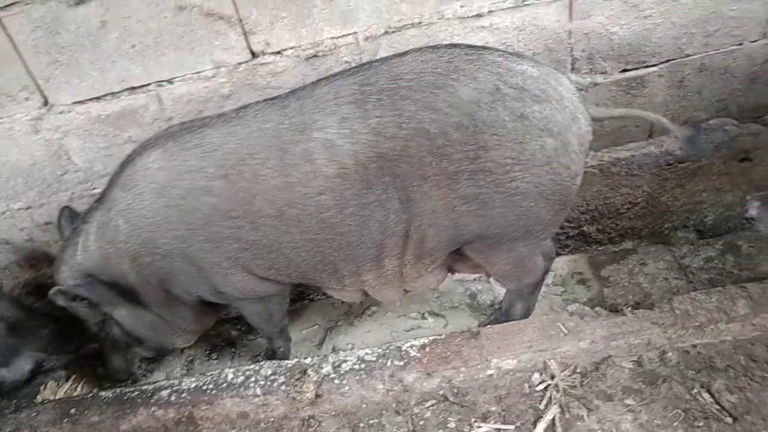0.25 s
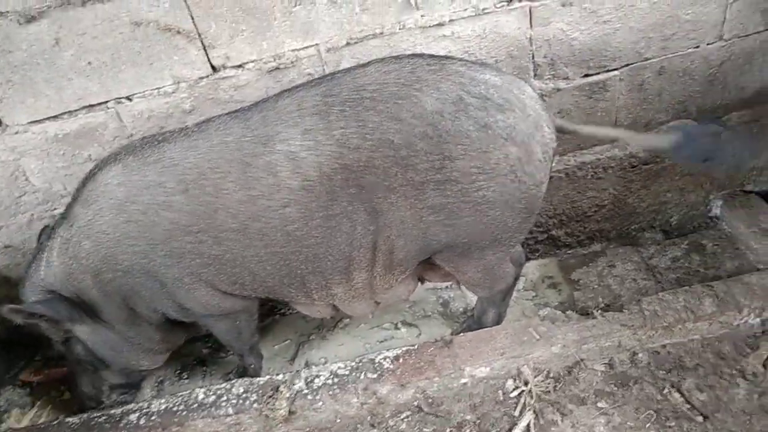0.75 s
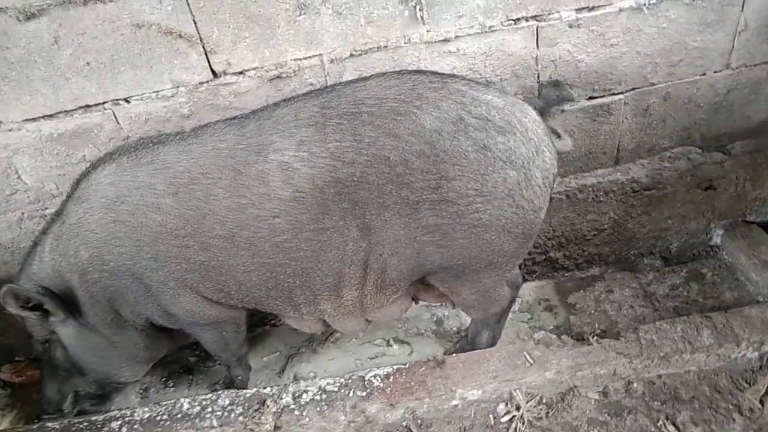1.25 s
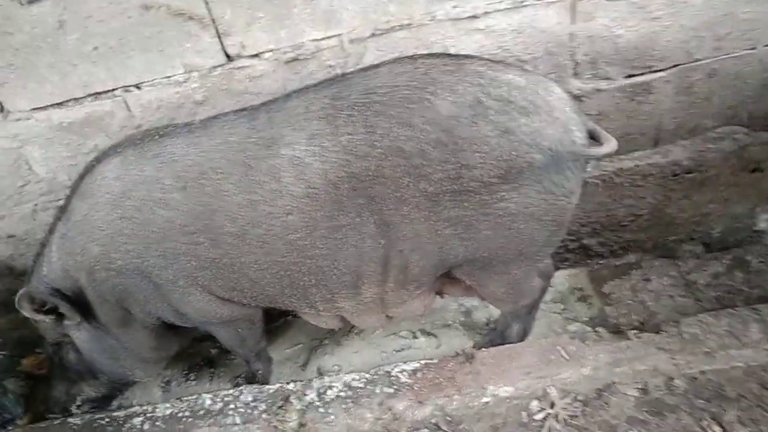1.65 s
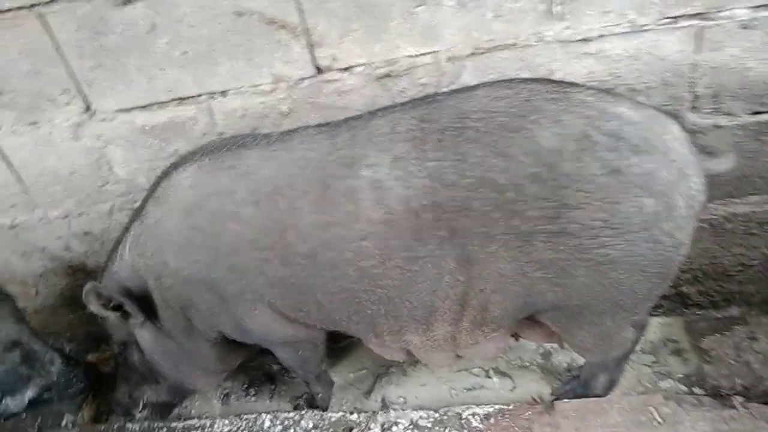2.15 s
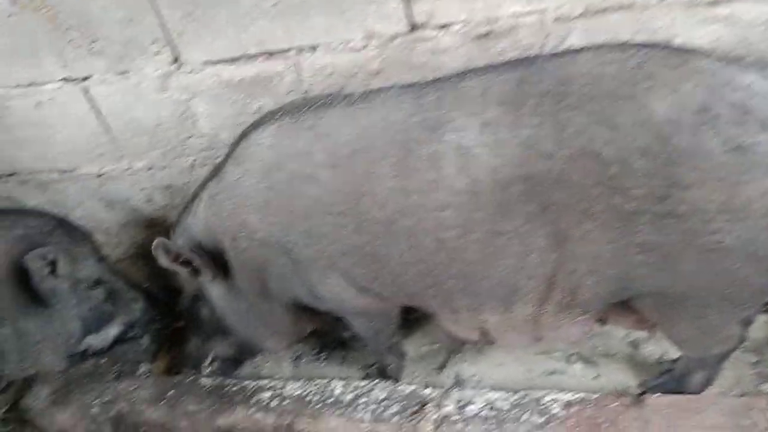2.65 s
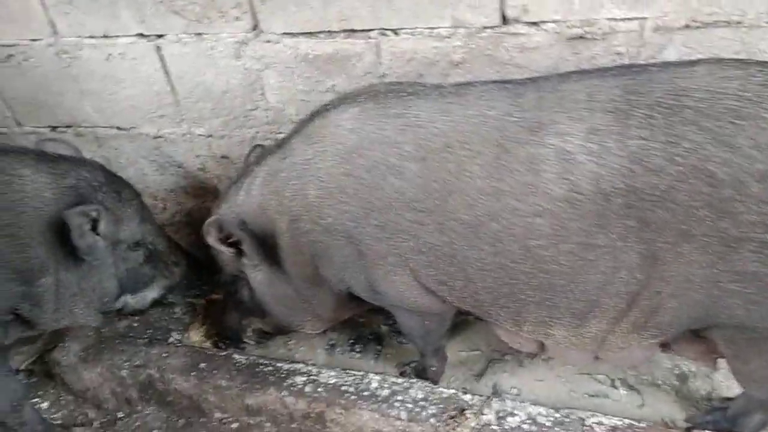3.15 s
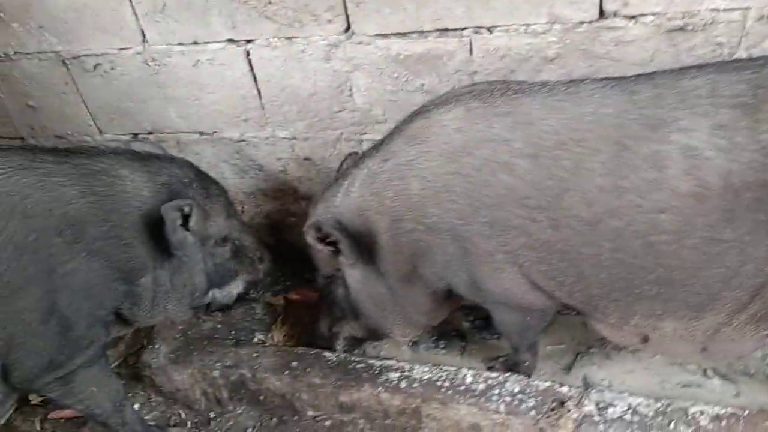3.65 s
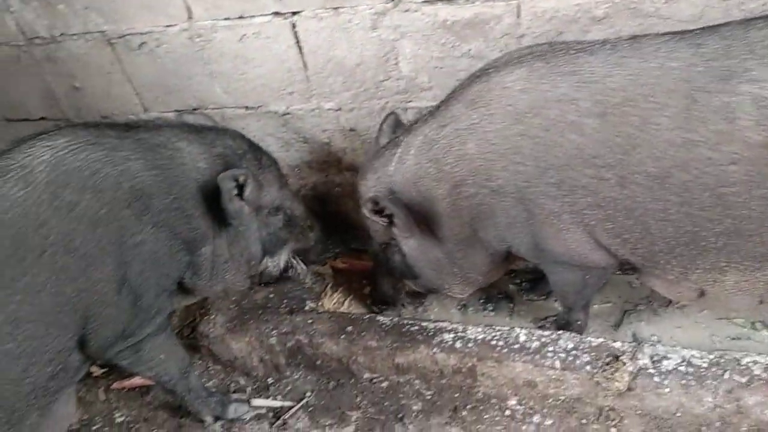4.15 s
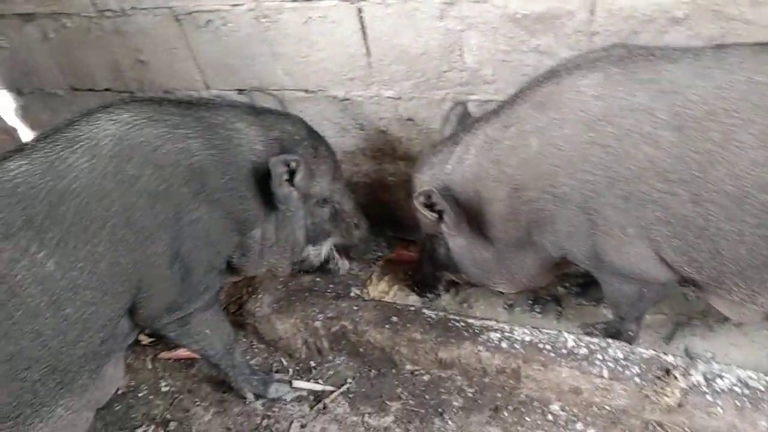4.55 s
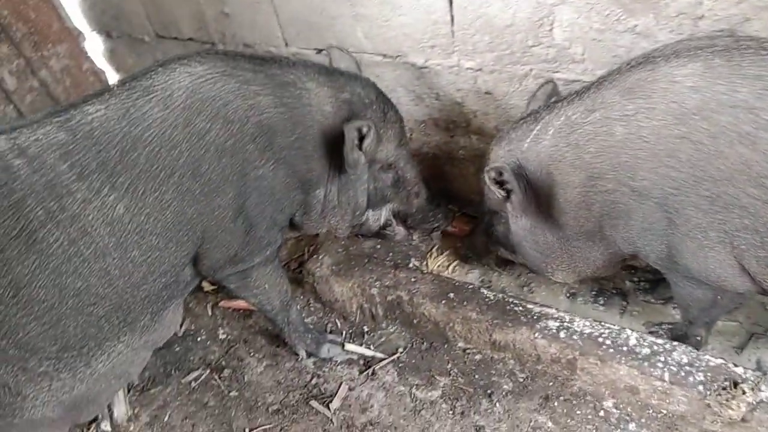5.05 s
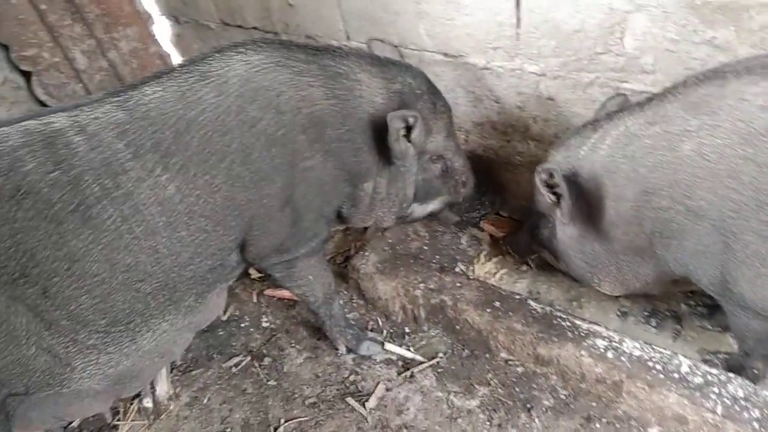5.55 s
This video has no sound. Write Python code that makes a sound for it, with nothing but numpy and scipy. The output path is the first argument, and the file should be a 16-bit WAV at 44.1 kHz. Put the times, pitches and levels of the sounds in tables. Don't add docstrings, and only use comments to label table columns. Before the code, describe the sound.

Close, wet, irregular pig eating: sucking slurps, sharp lip smacks, squelches and plops in a small hard-walled pen.

```python
import sys
import numpy as np
from scipy import signal
from scipy.fft import rfft, irfft, next_fast_len
from scipy.io import wavfile
from scipy.ndimage import uniform_filter1d, map_coordinates

SR = 44100
rng = np.random.default_rng(int(sys.argv[2]) if len(sys.argv) > 2 else 0)


def persist_wave(psi):
    counts = np.round(np.clip(psi, -1, 1) * 32767).astype(np.int16)
    wavfile.write(sys.argv[1], SR, np.atleast_2d(counts).T)


def elevation(decibels):
    levels = np.asarray(decibels, float)
    return 10 ** (levels / 20)


N = 256030

# (frequency [Hz], density [dB per Hz])
MOUTH_SPECTRUM = [(800, -120), (1150, -29), (1350, -6.5), (1600, -3.5), (2400, -4), (3200, 0), (3800, -7.5),
                  (4600, -29), (7000, -120)]
# (frequency [Hz], density [dB per Hz])
SPRAY_SPECTRUM = [(2400, -120), (3500, -13.5), (4500, -6.5), (6600, -4.5), (8500, -9.5), (10500, -15.5),
                  (11500, -25.5), (16000, -31.5)]


def unit(x):
    return x / np.sqrt(np.mean(x ** 2) + 1e-20)


def curve(rows):
    return np.interp(np.arange(N) / SR, *np.transpose(rows))


def along(points, hz):
    f, v = np.transpose(points)
    return np.interp(np.log(hz + 1), np.log(f + 1), v)


def filtered(x, response):
    m = next_fast_len(len(x) + 4096)
    return irfft(rfft(x, m) * response(np.fft.rfftfreq(m, 1 / SR)), m)[:len(x)]


def coloured(x, spectrum):
    return unit(filtered(x, lambda hz: elevation(along(spectrum, hz))))


def resonance(hz, width_hz):
    def response(f):
        single = 1j * f * width_hz / (hz * hz - f * f + 1j * f * width_hz)
        return single ** 2 * np.minimum(f / hz, 1) ** 2
    return response


def formant(x, hz, width_hz, lift_db):
    f, t, z = signal.stft(x, SR, nperseg=256)
    at = np.minimum((t * SR).astype(int), N - 1)
    lift = elevation(lift_db[at] / (1 + ((f[:, None] - hz[at]) / width_hz) ** 2))
    lift = lift / np.sqrt(np.mean(lift[8:22] ** 2, axis=0))
    return signal.istft(z * lift, SR, nperseg=256)[1][:N]


def patchy(x, depth_db, bins, frames, size=256):
    z = signal.stft(x, nperseg=size)[2]
    field = uniform_filter1d(rng.standard_normal(z.shape), bins, 0)
    field = uniform_filter1d(field, frames, 1)
    return signal.istft(z * elevation(depth_db * unit(field)), nperseg=size)[1][:len(x)]


def crackle(n, per_s, spread_db, hiss):
    hardness = elevation(spread_db * rng.standard_normal(n).clip(-2, 2))
    bursts = (rng.random(n) < per_s / SR) * hardness
    signs = np.sign(rng.standard_normal(n))
    return unit(unit(bursts * signs) + hiss * rng.standard_normal(n))


def bubbles(count, centre_hz, octaves, cycles):
    draw, t = rng.random((count, 2)), np.arange(1024) / SR
    hz = centre_hz * 2 ** (octaves * rng.standard_normal((count, 1)).clip(-2, 2))
    life = t * hz / cycles
    size = elevation(2.6 * np.minimum(-np.log(draw[:, 1:] + 1e-9), 3))
    swing = np.sin(2 * np.pi * hz * t * (1 + 0.12 * life))
    tones = size * life * np.exp(-4 * life) * swing
    at = (draw[:, :1] * N).astype(int) + np.arange(1024)
    return unit(np.bincount(at.ravel(), tones.ravel())[:N])


def rings(events, rise, attack_s):
    out, t = np.zeros(N + SR), np.arange(SR // 5) / SR
    for s, db, hz, t60 in events:
        phase = 2 * np.pi * hz * (t + rise * t * t)
        decay = elevation(db - 60 * t / np.clip(t60, 0.01, 0.3))
        out[round(s * SR):][:len(t)] += decay * (1 - np.exp(-t / attack_s)) * np.sin(phase)
    return out[:N]


def squeezes(events, sharpness, attack_share):
    out, t = np.zeros(N + SR), np.arange(SR // 5) / SR
    for s, db, hz, t60 in events:
        t60 = np.clip(t60, 0.01, 0.3)
        films = crackle(len(t), per_s=2200, spread_db=5.5, hiss=0.66)
        burst = unit(filtered(films, resonance(hz, hz / sharpness)))
        swell = 1 - np.exp(-t / (attack_share * t60))
        out[round(s * SR):][:len(t)] += elevation(db + 5 - 60 * t / t60) * swell * burst
    return out[:N]


def effort(starts, holds, levels_db, rise_s, sag_db_per_s, fall_db_per_s, rest_db):
    step = 32
    t = np.arange(0, N + step, step) / SR - np.reshape(starts, (-1, 1))
    sag_db = sag_db_per_s * t.clip(0)
    fall_db = fall_db_per_s * (t - np.reshape(holds, (-1, 1))).clip(0)
    gain = elevation(np.reshape(levels_db, (-1, 1)) - sag_db - fall_db) * np.clip(t / rise_s, 0, 1) ** 2
    power = np.sum(gain ** 2, axis=0) + elevation(rest_db) ** 2
    return np.interp(np.arange(N) / step, np.arange(len(power)), np.sqrt(power))


def air():
    # (frequency [Hz], density [dB per Hz])
    hum_spectrum = [(15, -70), (30, -30), (42, -2), (54, -6), (75, -13), (150, -27), (400, -34.5)]
    # (frequency [Hz], density [dB per Hz])
    pen_spectrum = [(1000, -47), (1500, -14), (3000, -1.5), (4100, -5.5), (5000, 0.5), (6400, -6),
                    (7100, -21), (16000, -28)]
    # (frequency [Hz], density [dB per Hz])
    hiss_spectrum = [(8000, -120), (10800, 0), (16000, -4)]
    hum = elevation(-72) * coloured(rng.standard_normal(N), hum_spectrum)
    breath = patchy(rng.standard_normal(N), depth_db=7, bins=3, frames=5, size=1024)
    trough = elevation(-69.5) * unit(filtered(breath, resonance(480, width_hz=190)))
    munching = patchy(rng.standard_normal(N), depth_db=8.5, bins=3, frames=18)
    far = elevation(-55.5) * coloured(munching, pen_spectrum)
    hiss = elevation(-79) * coloured(rng.standard_normal(N), hiss_spectrum)
    return hum + trough + far + hiss


def walls(x):
    # (frequency [Hz], t60 [s])
    wall_decay = [(300, 0.24), (2500, 0.26), (10000, 0.06)]
    hz, t, z = signal.stft(rng.standard_normal(SR // 3), SR, nperseg=256)
    fade = elevation(-60 * t / along(wall_decay, hz)[:, None])
    tail = signal.istft(z * fade, SR, nperseg=256)[1]
    delayed = np.pad(x, (150, 0))
    return signal.fftconvolve(delayed, tail / np.linalg.norm(tail))[:N]


def late_notch(x):
    # (time [s], level [dB])
    notch_depth = [(4.9, -2), (5.56, -4), (5.66, -18)]
    return formant(x, np.full(N, 4350), 490, lift_db=curve(notch_depth))


def creaks():
    # (start [s], end [s], slip rate [1/s], level [dB])
    slides = [
        (2.636, 2.805, 124, -31),
        (2.826, 2.85, 85, -32),
        (2.928, 2.965, 105, -31),
    ]
    out = np.zeros(N)
    for start, end, per_s, db in slides:
        draw = rng.standard_normal((40, 2))
        s = start + (np.arange(40) + 0.12 * draw[:, 0]) / per_s
        out[(s[s < end] * SR).astype(int)] = elevation(db + 2.2 * draw[s < end, 1])
    return filtered(out, lambda f: 1 / (1 + (7000 / (f + 1)) ** 4))


def ticks():
    # (time [s], edge [dB], knock [dB], knock frequency [Hz], thump [dB])
    slips = [(4.2033, -36.7, -30.4, 2800, -51.4), (4.2288, -35.5, -28.9, 2020, -46.7),
             (4.335, -31.8, -24.2, 2070, -39.5), (4.3645, -34.4, -23.4, 2020, -40.4),
             (4.3915, -31.2, -21.1, 2150, -35.6), (4.4241, -31.1, -19.2, 1940, -37.1),
             (4.5318, -27.5, -21.2, 2370, -37.9), (4.8251, -31.7, -19.1, 1810, -37.6),
             (4.8373, -33.6, -21.4, 1350, -36.8), (4.8495, -35.3, -21.7, 1500, -36.3),
             (4.8605, -35.1, -20.6, 1550, -38.8), (4.8726, -30.7, -20.9, 2000, -35.0),
             (4.891, -33.9, -24.1, 1230, -37.3), (4.9312, -30.9, -20.2, 2000, -34.2),
             (4.9731, -27.8, -21.3, 1720, -37.1), (5.1411, -31.1, -20.1, 1590, -33.7),
             (5.2829, -48, -21, 1500, -50), (5.2849, -35, -11.5, 2050, -19.1),
             (5.3289, -25.5, -16.5, 1300, -32), (5.5003, -30.0, -14.2, 1740, -26.0)]
    out = np.zeros(N + SR)
    t = np.arange(SR // 20) / SR - 0.001
    for s, edge_db, knock_db, hz, thump_db in slips:
        edge = -elevation(edge_db + 10) * np.exp(-(t / 0.00003) ** 2) * np.cos(2 * np.pi * 7000 * t)
        snap_hz = rng.normal(4600, 500)
        snap = np.exp(-((t - 0.0001) / 0.00014) ** 2) * np.sin(2 * np.pi * snap_hz * t)
        snap = elevation((edge_db + knock_db) / 2 + 4) * snap
        u = t - 0.00042
        before, after = np.exp(-(u * hz / 0.43) ** 2), np.exp(-(u.clip(0) * hz / 0.62) ** 1.3)
        knock = -elevation(knock_db + 1.5) * np.where(u < 0, before, after) * np.sin(2 * np.pi * hz * u)
        swell = np.clip(t / 0.002, 0, 1) ** 2 * elevation(-60 * np.abs(t - 0.003) / 0.022)
        thump = elevation(1.2 * thump_db + 4) * swell * np.cos(2 * np.pi * 410 * (t - 0.0023))
        push = elevation(thump_db - 12 - 60 * np.abs(t) / 0.05) * np.sin(2 * np.pi * 140 * t.clip(0))
        out[round((s - 0.001) * SR):][:len(t)] += edge + snap + knock + thump + push
    return out[:N]


def trough_bumps():
    # (time [s], level before the attack [dB], frequency [Hz], t60 [s])
    bumps = [
        (2.121, -28.5, 182, 0.024),
        (2.324, -38, 204, 0.033),
        (3.048, -47, 72.7, 0.066),
        (3.149, -41, 183, 0.018),
        (4.829, -44.5, 166, 0.42),
        (4.898, -38, 205, 0.046),
        (5.387, -20, 690, 0.01),
    ]
    return rings(bumps, rise=0, attack_s=0.0021)


def plops():
    # (time [s], level before the slow attack [dB], frequency [Hz], t60 [s])
    pockets = [(0.026, -10.5, 1590, 0.038), (0.49, -3.5, 1584, 0.047), (0.679, -10, 1629, 0.048),
               (1.11, -9, 790, 0.02), (1.42, -17.5, 690, 0.044), (2.108, -12, 1370, 0.023),
               (2.2, -8, 243, 0.027), (2.375, -20.5, 1090, 0.037), (3.35, -21, 1360, 0.083),
               (3.711, -20, 456, 0.028), (3.977, -7.5, 991, 0.054), (4.039, -8.5, 248, 0.029),
               (5.068, -20, 1950, 0.04), (5.14, -14.5, 1477, 0.07), (5.346, -3, 2080, 0.026),
               (5.478, -13.5, 545, 0.028), (5.763, -28, 1950, 0.067)]
    return rings(pockets, rise=1.42, attack_s=0.023)


def sloshes():
    # (time [s], level [dB], frequency [Hz], t60 [s])
    shifts = [(.238, -47, 720, 0.12), (1.243, -39.5, 730, 0.067), (1.403, -32, 865, 0.056),
              (1.455, -57, 497, 0.49), (1.66, -59.5, 200, 0.14), (2.18, -35, 870, 0.055),
              (2.578, -37, 1310, 0.053), (2.79, -48, 280, .08), (3.05, -38, 1300, 0.053),
              (3.055, -48.5, 547, 0.075), (3.122, -39.5, 900, 0.069), (3.35, -41.5, 504, 0.14),
              (3.443, -44, 1300, .07), (3.87, -53, 1350, 0.25), (3.958, -44, 1310, 0.06),
              (4.665, -43.5, 687, 0.083), (4.865, -40, 253, 0.17), (4.98, -49, 398, 0.055),
              (5.105, -54, 396, 0.16), (5.142, -37.5, 660, 0.087), (5.243, -40, 302, 0.082),
              (5.352, -51, 500, .03), (5.39, -41, 131, 0.05), (5.503, -49, 900, .04)]
    return squeezes(shifts, sharpness=2.8, attack_share=0.057)


def spurts():
    # (time [s], level [dB], frequency [Hz], t60 [s])
    squirts = [(.028, -55, 10200, 0.045), (.155, -60, 12500, 0.18), (.243, -41, 6500, .03),
               (.4378, -46, 7500, 0.017), (.443, -28, 9400, 0.043), (.505, -56, 13000, .08),
               (.715, -43.5, 7400, 0.26), (.838, -51, 10000, 0.084), (.964, -38.5, 6770, .09),
               (1.34, -45, 5700, 0.091), (1.41, -50, 10700, 0.12), (1.678, -60, 8000, 0.041),
               (1.915, -41, 6000, 0.055), (2.15, -41, 6850, 0.091), (2.328, -55.5, 6640, 0.18),
               (2.377, -42, 4250, 0.086), (2.497, -42, 8140, 0.059), (2.672, -38, 7100, 0.19),
               (2.737, -37, 6800, 0.054), (2.838, -55, 8000, .04), (2.862, -43, 9800, 0.059),
               (2.868, -41, 4570, 0.12), (3.13, -59, 12400, 0.18), (3.228, -43, 3870, 0.042),
               (3.398, -45, 4600, 0.061), (3.505, -50, 12000, .15), (3.68, -51, 6050, 0.069),
               (3.69, -35, 8200, .08), (3.958, -41, 6900, 0.036), (3.98, -34, 5250, .08),
               (3.98, -50, 11000, .1), (4.258, -33, 5350, 0.086), (4.545, -45, 8650, 0.094),
               (4.595, -36.5, 5000, 0.088), (4.745, -50, 8700, 0.074), (4.96, -41, 8000, 0.1),
               (5.128, -51, 8350, 0.085), (5.251, -40.5, 6100, 0.11), (5.41, -47, 6000, 0.07),
               (5.718, -59, 12500, .14)]
    return squeezes(squirts, sharpness=3.7, attack_share=0.038)


def squelches():
    # (time [s], level [dB], frequency [Hz], t60 [s])
    presses = [(.03, -32.5, 3300, 0.048), (.155, -38, 1850, 0.13), (.243, -26.5, 3070, 0.021),
               (.392, -31.5, 3740, 0.11), (.4915, -18, 2690, 0.013), (.718, -43, 3100, 0.17),
               (.8, -38, 1620, 0.15), (.964, -34, 2940, .07), (1.105, -43, 532, 0.14),
               (1.155, -46, 1770, 0.08), (1.25, -39.5, 1670, 0.11), (1.34, -38, 2050, 0.13),
               (1.525, -44, 2200, .08), (1.8, -64, 3300, .08), (1.917, -30.5, 3500, 0.095),
               (1.945, -38, 950, 0.081), (2.03, -35, 1740, 0.055), (2.121, -37, 497, 0.016),
               (2.203, -34, 800, 0.056), (2.275, -38.5, 1820, 0.099), (2.595, -29, 2880, 0.13),
               (2.605, -30, 1270, 0.093), (2.736, -42, 1310, 0.059), (2.79, -32.5, 1690, 0.14),
               (2.853, -29.5, 1320, 0.048), (2.858, -34, 2900, .07), (2.872, -34.5, 1660, 0.039),
               (3.331, -35, 2070, 0.16), (3.355, -62, 306, .1), (3.388, -32.5, 1340, 0.12),
               (3.503, -33.5, 4300, 0.11), (3.504, -37, 3560, 0.043), (3.791, -39, 3550, 0.043),
               (3.974, -32.5, 3250, 0.075), (4.008, -36.5, 1750, 0.12), (4.268, -31, 2430, 0.016),
               (4.478, -46.5, 1750, 0.066), (4.566, -38, 960, 0.091), (4.594, -33.5, 3030, 0.084),
               (4.872, -38, 2420, 0.14), (5.128, -40.5, 377, 0.1), (5.147, -29, 1380, 0.038),
               (5.235, -33.5, 1830, 0.066), (5.264, -28.5, 380, 0.028), (5.336, -30.5, 2030, 0.059),
               (5.362, -41, 1930, 0.06), (5.411, -39, 1490, 0.053), (5.47, -40, 750, 0.12),
               (5.627, -37, 1820, .06), (5.725, -39, 2330, 0.065)]
    return squeezes(presses, sharpness=3.3, attack_share=0.047)


def smacks():
    # (time [s], peak level [dB], mouth [Hz], spray relative
    # level [dB], t60 [s])
    partings = [(0.0235, -22.5, 1670, -5, 0.027), (0.3849, -21.5, 2640, 0.5, 0.22),
                (0.4415, -12.5, 1260, 9, 0.021), (0.834, -19, 3120, -1.5, 0.09),
                (1.1748, -19, 3240, -2.5, 0.081), (1.4121, -33.5, 920, 7.5, 0.072),
                (1.488, -26.5, 3600, 3.5, 0.17), (2.5706, -22.5, 2670, -0.5, 0.097),
                (2.6138, -12, 3140, -16, 0.067), (2.733, -22.5, 2200, 2, 0.06),
                (2.86, -18.5, 920, 1.5, 0.12), (2.9565, -23, 2800, 6, 0.028),
                (3.0769, -16.5, 3450, -6.5, 0.086), (3.687, -26, 805, 16, 0.15),
                (3.977, -20.5, 1070, 7.5, 0.1), (4.2572, -30, 3020, 10, 0.15), (4.3537, -32, 3380, 6, 0.24),
                (4.574, -28.5, 1280, 0, 0.18), (4.954, -25.5, 2120, -2, 0.13),
                (5.117, -22, 2730, -7.5, 0.054), (5.2486, -28, 2010, -9, 0.17),
                (5.4314, -37.5, 1390, 16.5, 0.1), (5.537, -29, 2230, 1.5, 0.22),
                (5.7216, -34.5, 1670, 6, 0.2),
                (0.2392, -17.5, 3190, -1.5, 0.14), (0.4902, -3, 3160, -20, 0.036),
                (0.53, -20, 3300, 1, 0.089), (0.6737, -27, 1600, -0.5, 0.18),
                (0.9547, -20.5, 1850, -4.5, 0.17), (1.1379, -16.5, 1950, -31, 0.066),
                (1.693, -22, 2400, -5.5, 0.14), (1.842, -26, 3140, -28, 0.069),
                (1.921, -23, 3280, 0.5, 0.25), (2.046, -24, 1730, -10, 0.098),
                (2.1077, -20, 1360, -23, 0.075), (2.397, -23.5, 2420, -11, 0.13),
                (2.5177, -10.5, 1550, -24, 0.03), (2.7906, -13.5, 2730, -14, 0.078),
                (3.038, -19, 2250, -24, 0.12), (3.2322, -25.5, 2570, -3, 0.19),
                (3.398, -16.5, 2160, -8, 0.11), (3.502, -24, 3640, -24, 0.19),
                (3.79, -22.5, 3300, -12, 0.22), (4.673, -20.5, 2590, -7, 0.13),
                (5.039, -39, 2050, 5, 0.028), (5.144, -15, 2360, -7.5, 0.16),
                (5.6366, -21.5, 1900, -34, 0.095), (5.743, -18, 2250, -40, 0.073)]
    out, t = np.zeros(N + SR), np.arange(SR // 4) / SR
    crack, swell = 1 - np.exp(-t / 0.0011), 1 - np.exp(-t / 0.0057)
    for s, db, hz, spray_db, t60 in partings:
        jet_hz = 5765 + 71 * (db + spray_db + 26.5) + 332 * rng.standard_normal()
        shape_db = 7.3 * rng.standard_normal(40)
        films = crackle(len(t), per_s=2900, spread_db=3.5, hiss=0.72)
        tear = filtered(films, lambda f: elevation(np.interp(f / 550, range(40), shape_db)))
        cavity = unit(filtered(tear, resonance(hz, width_hz=1000)))
        cavity = cavity + 0.62 * coloured(tear, MOUTH_SPECTRUM)
        mist = filtered(tear, lambda f: np.minimum(f / jet_hz, 1) ** 3)
        jet = unit(filtered(tear, resonance(jet_hz, width_hz=1300)))
        jet = jet + 0.9 * coloured(mist, SPRAY_SPECTRUM)
        fade = elevation(db - 7.5 - 60 * t / np.clip(t60, 0.02, 0.5))
        out[round(s * SR):][:len(t)] += fade * (swell * cavity + elevation(spray_db - 8.0) * crack * jet)
    return out[:N]


def slurp():
    # (time [s], hold [s], suction [dB], spray through the lips [dB])
    sucks = [(0.0, 0.06, -38, -53), (0.095, 0.096, -39, -43), (0.213, 0.085, -41.5, -44.5),
             (0.405, 0.14, -34, -40), (0.469, 0.031, -28, -38.5), (0.642, 0.35, -36.5, -50),
             (1.016, 0.052, -44, -57), (0.812, 0.031, -37, -40.5), (0.927, 0.038, -34, -62),
             (1.087, 0.046, -35, -54), (1.142, .15, -38.5, -48.5), (1.319, 0.19, -36.5, -47.5),
             (1.622, 0.056, -46, -51), (1.656, 0.022, -34.5, -53), (1.893, 0.12, -39, -47.5),
             (2.114, 0.1, -31.5, -40.5), (2.354, 0.2, -38, -52), (2.566, 0.07, -30, -39),
             (2.717, 0.18, -33.5, -43.5), (2.938, 0.26, -38, -44.5), (3.329, 0.15, -37, -54),
             (3.373, 0.13, -60, -43), (3.487, 0.056, -32, -40.5), (3.653, 0.17, -39, -45),
             (3.953, 0.037, -30, -30.5), (4.065, 0.047, -49.5, -48.5), (4.214, 0.22, -38.5, -48),
             (4.529, 0.15, -35.5, -47), (4.707, 0.068, -38, -55.5), (4.808, 0.11, -41.5, -48),
             (5.122, 0.066, -31.5, -40), (5.312, 0.03, -45, -80), (5.415, 0.065, -36.5, -48),
             (5.58, 0.21, -39, -65)]
    # (time [s], hold [s], throat [dB], jowl [dB], jowl lag [s])
    gulps = [(0.113, 0.073, -52.5, -60, 0.035), (0.22, 0.06, -56, -51.5, 0.01),
             (0.406, 0.16, -42, -58, 0.047), (0.711, 0.2, -45.5, -49.5, 0.02),
             (0.931, 0.09, -42, -61, 0.031), (1.093, 0.088, -46.5, -55, 0.002),
             (1.191, 0.13, -47.5, -75, 0.01), (1.334, 0.2, -38.5, -46, 0.063),
             (1.658, 0.08, -44.5, -59, 0.011), (1.903, 0.15, -43.5, -61, 0.057),
             (2.11, 0.2, -43, -49, 0.0059), (2.386, 0.14, -43.5, -65.5, 0.0073),
             (2.575, 0.17, -39.5, -48, 0.028), (2.764, 0.27, -41, -48, 0.044),
             (3.065, 0.19, -42, -48, 0.04), (3.345, 0.2, -37, -40.5, 0.055),
             (3.672, 0.18, -43, -44.5, 0.025), (3.943, 0.19, -49, -48.5, 0.052),
             (4.245, .2, -43.5, -47, 0.013), (4.548, 0.1, -44, -52, 0.031), (4.682, 0.1, -49.5, -75, 0.01),
             (4.813, 0.17, -43.5, -44.5, 0.086), (5.115, 0.25, -39.5, -45.5, 0.07),
             (5.409, 0.24, -40, -48, 0.0045), (5.695, 0.069, -40.5, -39.5, 0.056)]
    # (frequency [Hz], density [dB per Hz])
    jowl_spectrum = [(40, -120), (80, -60), (160, -9.5), (250, 2), (330, -6.5), (480, 6), (600, -5),
                     (700, -3), (900, -120)]
    # (frequency [Hz], density [dB per Hz])
    throat_spectrum = [(400, -120), (600, -17.5), (720, -3), (900, -3), (1200, -4.5), (1400, -8),
                       (2000, -120)]
    # (time [s], resonance [Hz])
    opening = [(0.0, 2500), (0.23, 3360), (0.69, 1790), (0.84, 2740), (1.0, 1870), (1.21, 2270),
               (1.34, 2070), (1.5, 2620), (1.9, 3550), (2.09, 2070), (2.62, 2450), (2.86, 1890),
               (3.15, 2740), (3.35, 1960), (3.78, 2830), (4.51, 2020), (5.5, 2100), (5.81, 2150)]
    # (time [s], level [dB])
    focus = [(4.9, 7.5), (5.3, 20)]
    suck_s, suck_hold, suction_db, spray_db = np.transpose(sucks)
    gulp_s, gulp_hold, throat_db, jowl_db, lag = np.transpose(gulps)

    clumps_per_s = 45
    draws = rng.standard_normal(N * clumps_per_s // SR + 4)
    clumps = map_coordinates(draws, [np.arange(N) * clumps_per_s / SR])
    wet = crackle(N, per_s=3500, spread_db=1, hiss=0.76) * elevation(3.05 * clumps)
    spits = 0.6 * crackle(N, per_s=400, spread_db=5, hiss=0)
    gurgle = bubbles(count=900, centre_hz=879, octaves=0.52, cycles=11.0)
    squelch = bubbles(count=2500, centre_hz=2320, octaves=0.476, cycles=11.6)

    jowl = coloured(patchy(wet, depth_db=1.5, bins=2, frames=5, size=1024), jowl_spectrum)
    jowl_hold = gulp_hold - lag - 0.018
    jowl = jowl * effort(gulp_s + lag, jowl_hold, jowl_db,
                         rise_s=0.0088, sag_db_per_s=32, fall_db_per_s=282, rest_db=-77)

    throat = coloured(patchy(wet, depth_db=4.5, bins=3, frames=5, size=1024), throat_spectrum)
    throat = throat + 0.6 * coloured(gurgle, throat_spectrum)
    throat = throat * effort(gulp_s, gulp_hold, throat_db - 4.0,
                             rise_s=0.024, sag_db_per_s=35, fall_db_per_s=310, rest_db=-80)

    mouth = coloured(patchy(wet, depth_db=4, bins=4, frames=7, size=512), MOUTH_SPECTRUM)
    mouth = mouth + 0.55 * coloured(squelch, MOUTH_SPECTRUM)
    mouth = formant(mouth, curve(opening), 1400, lift_db=curve(focus))
    mouth = mouth * effort(suck_s, suck_hold, suction_db - 4.5,
                           rise_s=0.017, sag_db_per_s=11.5, fall_db_per_s=185, rest_db=-56)

    spray = coloured(patchy(wet + spits, depth_db=3, bins=3, frames=40), SPRAY_SPECTRUM)
    spray = spray * effort(suck_s, suck_hold, spray_db,
                           rise_s=0.029, sag_db_per_s=-9.5, fall_db_per_s=252, rest_db=-97)
    return jowl + throat + mouth + spray


def scene():
    pigs = slurp() + smacks() + plops() + trough_bumps()
    pigs = pigs + squelches() + spurts() + sloshes()
    pen = late_notch(pigs + elevation(-11.5) * walls(pigs) + air())
    return (pen + ticks() + creaks())[None]


def top_cut(x):
    return signal.sosfilt(signal.butter(12, 16660, fs=SR, output="sos"), x)


def record(dry):
    low_hz, top_hz = 45.6, 15900

    def band(hz):
        skirt = elevation(-25) * (hz < top_hz + 700)
        return np.where(hz < top_hz, 1, skirt) * hz ** 4 / (hz ** 4 + low_hz ** 4)

    mix = filtered(dry[0], band)[None]
    return top_cut(mix)


dry = scene()
out = record(dry)
persist_wave(out)
```